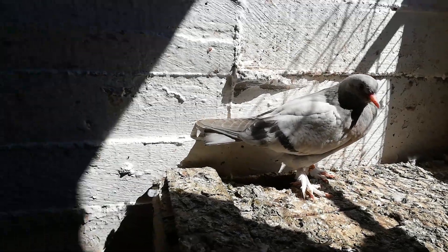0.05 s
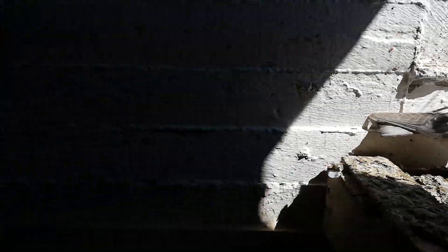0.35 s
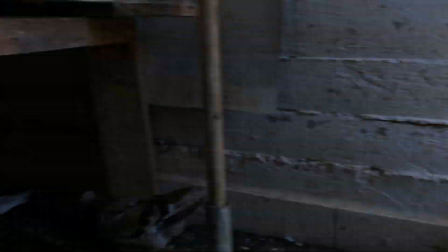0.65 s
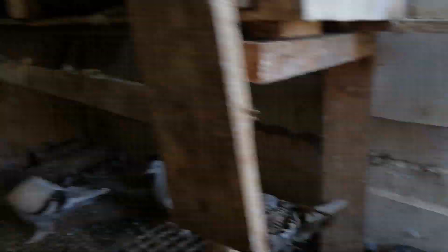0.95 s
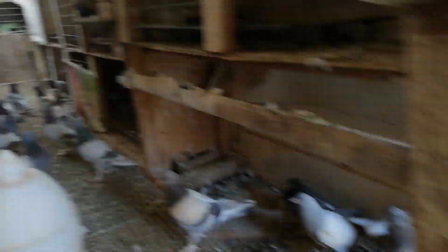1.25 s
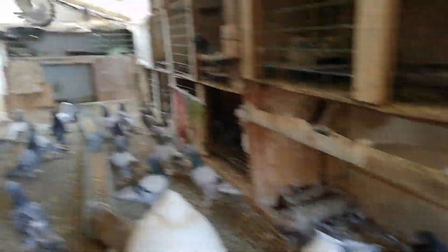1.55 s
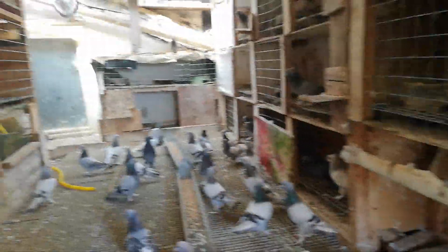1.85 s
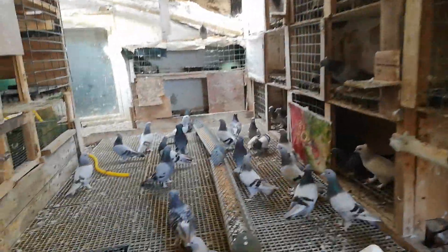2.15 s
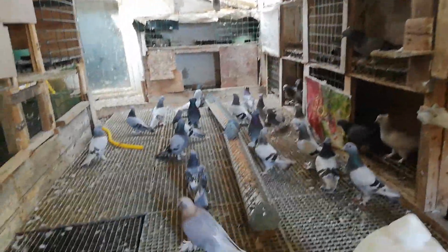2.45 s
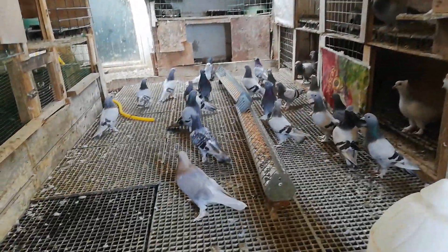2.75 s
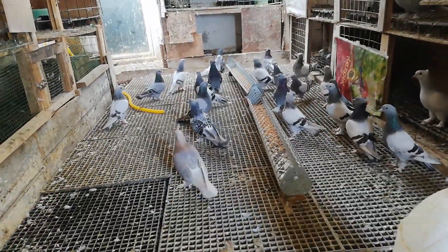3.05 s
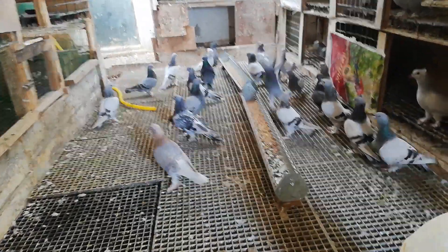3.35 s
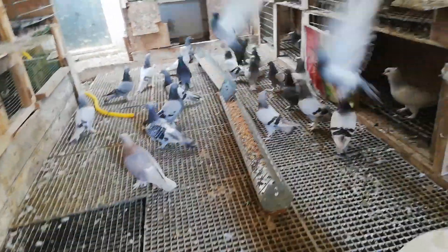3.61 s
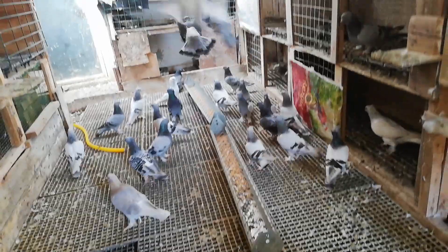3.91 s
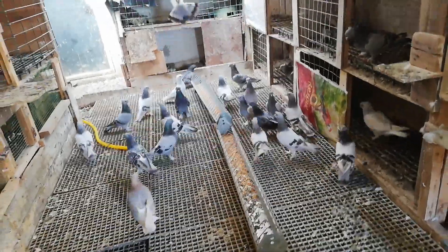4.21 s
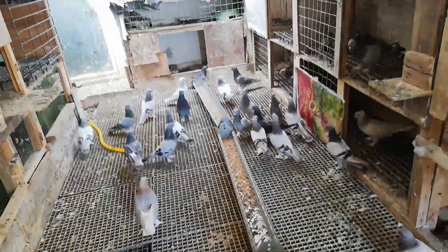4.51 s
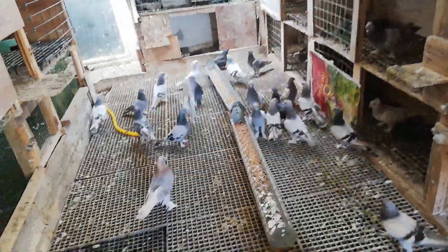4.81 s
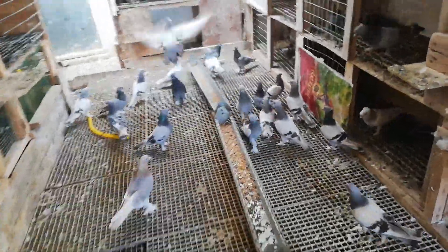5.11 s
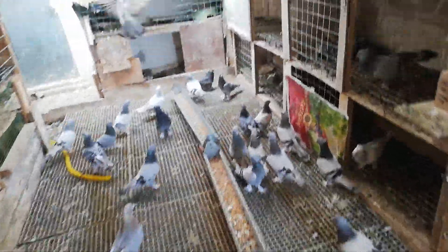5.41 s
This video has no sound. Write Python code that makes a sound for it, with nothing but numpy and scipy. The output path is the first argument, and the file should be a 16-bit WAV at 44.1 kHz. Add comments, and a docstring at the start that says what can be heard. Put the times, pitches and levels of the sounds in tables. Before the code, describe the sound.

Pigeons flutter in bursts, their wings clapping about eight times a second with a feathery snap, a hollow pop and a swish. The first and loudest burst gives way to quiet coos, thin peeps and claws ticking on grating, before a second burst and a softer third. The sounds are close, with a brief ring off the boards of a small loft and low buffeting on the hand-held microphone.

```python
"""In a small wooden loft, pigeons take off and flutter close to a hand-held microphone.
Their wing tips collide about eight times a second, each clap a snap of feathers and a pop of trapped air.
The strokes shed turbulence that swishes and buffets the microphone; the feathers rustle and whistle.
On the floor the flock shuffles, ticks on the grating, coos and gives short, thin calls.
Reflections off the boards add a brief ring to the impacts and the notes."""
import sys
import numpy as np
from scipy import signal
from scipy.fft import rfft, irfft, next_fast_len
from scipy.io import wavfile
from scipy.ndimage import map_coordinates

SR = 44100
rng = np.random.default_rng(int(sys.argv[2]) if len(sys.argv) > 2 else 0)


def dump(signal):
    """Clip the signal to [-1, 1] and save it as 16-bit WAV at the path in sys.argv[1]."""
    limited = np.clip(np.atleast_2d(signal).T, -1, 1)
    pcm = np.round(limited * 32767).astype(np.int16)
    wavfile.write(sys.argv[1], SR, pcm)


N = 249906
TIME = np.arange(N) / SR

# Bouts of flapping. Each row: start in seconds, rise time in seconds, end in seconds,
# decay in dB per second, then the levels of swish, rustle and push at full effort in dB.
BOUTS = [(0, 1, 1.266, 200, -38, -39, -44.5), (1.25, 0.44, 1.99, 187, -37, -45, -41.5),
         (3.39, .2, 4.39, 160, -38.3, -41.5, -41.5), (4.519, 0.011, 4.54, 71, -47, -42, -46.5),
         (4.81, 0.25, 5.53, 37, -41.5, -47.5, -44.5)]
# The start of a bout. One row: swish, rustle and push in dB relative to full effort.
BOUT_START_DB = (-13.5, -9.5, -14)
# Wing claps. Each row: start in seconds, relative level in dB, relative weight of the pop in dB,
# brightness of the snap (0 is neutral), time the feathers take to meet in seconds.
WING_CLAPS = [(0.0459, -42.5, 5, 13, 0.0014), (0.124, -37.5, 6, 5, 0.0064), (0.2485, -37, 6, 1.5, 0.012),
              (0.3738, -33.5, 5, -1, 0.011), (0.5023, -36.5, 3, -8, 0.0078),
              (0.574, -40.0, 0.5, -6, 0.0079), (0.6185, -35.5, -16, -3.5, 0.0054),
              (0.7314, -26, 1, -3.5, 0.011), (0.799, -35, 3, -4, 0.002), (0.8452, -28.5, 1, -2.5, 0.0034),
              (1.0886, -19.5, -3, 4.5, 0.00024), (1.2122, -22.5, 5, 2, 0.0018),
              (1.3402, -26.5, 7.5, 0.5, 0.0048), (1.4704, -24.5, 2, -2.5, 0.0016),
              (1.597, -20.5, -0.5, -1, 0.003), (1.7091, -16.5, -3, 5.5, 0.0089),
              (1.8192, -21.5, 1, 0, 0.0067), (1.9326, -26, 1.5, 0, 0.0067), (3.392, -36.5, 3, 0, 0.0066),
              (3.5139, -26, -1.5, 4, 0.004), (3.634, -27.5, 4, 3.5, 0.01), (3.7557, -28, 8.5, -1.5, 0.0033),
              (3.876, -24, 3, 1, 0.0038), (3.9933, -26, 3.5, -2, 0.0053), (4.115, -27.5, 9.5, -4, 0.011),
              (4.245, -37.5, 6, -1.5, 0.022), (4.3549, -28.5, -11, -2, 0.0092), (4.385, -35.5, 7, 0, 0.01),
              (4.527, -42.5, 7.5, -12, 0.012), (4.837, -39.5, -1, 15, 0.013), (4.8889, -38.5, -5, 1, 0.017),
              (5.01, -28.5, 0, -2.5, 0.019), (5.133, -36, 2, -2, 0.0063), (5.254, -33.5, -15, -5, 0.0056),
              (5.3691, -30, -6, -0.5, 0.0075), (5.616, -40.5, -18.5, 7, 0.0057)]
# Brief low rumbles as the hand-held microphone moves.
# Each row: middle in seconds, half length in seconds, level in dB.
HANDLING_RUMBLES = [(2.85, 0.44, -52), (4.23, .08, -41), (5.45, 0.14, -43)]
# Nearby claws and beaks on the grating. Each row: start in seconds, relative peak level in dB.
FLOOR_TAPS = [(2.1162, -37.5), (2.2417, -40.5), (2.2777, -38), (2.347, -47), (2.66, -43), (2.7687, -55),
              (2.898, -43), (2.9597, -37), (4.813, -30)]
# Notes of feathers and voices. Each row: start in seconds, length in seconds, start pitch in Hz,
# main pitch in Hz, level in dB, roughness from 0 to 1.
FEATHER_NOTES = [(1.52, 0.058, 995, 775, -40.5, 0.85), (1.645, 0.039, 874, 894, -36.5, 0.32),
                 (1.975, 0.025, 783, 825, -41, 0.54), (3.42, 0.055, 623, 666, -50, 0.23),
                 (3.555, 0.017, 810, 830, -38, 0.74), (4.285, 0.024, 1060, 1030, -42, 0.6),
                 (5.46, 0.02, 420, 354, -39.5, 0.83)]
CALL_NOTES = [(2.485, 0.054, 1022, 982, -57.5, 0.3), (2.888, .098, 1036, 1160, -48.5, 0.4),
              (2.985, 0.04, 1063, 1170, -57, 0.61), (4.135, 0.057, 1220, 1246, -42.5, 0.14),
              (4.66, 0.041, 1146, 1271, -40, 0.24), (4.706, 0.02, 1280, 1235, -33.5, 0.28),
              (4.734, 0.059, 1200, 1246, -47.5, 0.58), (4.833, 0.015, 1400, 1450, -44.5, 0.63),
              (5.2, 0.097, 1236, 1230, -37.5, 0.11)]
COO_NOTES = [(2.52, 0.091, 175, 150, -51.5, 0.8), (2.66, 0.2, 201, 150, -55, 0.75),
             (2.855, 0.047, 229, 222, -43.5, 0.42), (2.895, 0.09, 215, 185.4, -46.5, 0.72),
             (4.52, 0.053, 198, 191, -43, 0.8)]
# Spectra of the sources. Each row: frequency in Hz, relative spectral density in dB.
SWISH_SPECTRUM = [(150, -28), (400, -7.5), (700, 1), (950, 1), (1400, -1), (1900, -6.5), (3000, -13),
                  (8000, -16)]
RUSTLE_SPECTRUM = [(500, -7), (2000, 0), (4000, 4), (6000, 0.5), (8500, 5.5), (12000, -1), (14000, -17),
                   (16000, -18)]
PUSH_SPECTRUM = [(60, -26), (125, 1.5), (180, -5), (235, 0.5), (270, -1.5), (305, 4.5), (345, -3.5),
                 (450, -1.5), (900, -26.5)]
WALL_BUFFET_SPECTRUM = [(10, -8), (30, 2.5), (50, -9), (72, 5), (100, -4.5), (160, -20), (500, -47)]
OPEN_BUFFET_SPECTRUM = [(10, -18), (30, 3.5), (50, -2), (80, -7), (120, -11), (200, -29), (500, -55)]
SHUFFLE_SPECTRUM = [(20, -22), (70, -8), (170, -1.5), (300, -6.5), (600, -12), (1100, -8.5), (1800, -15),
                    (4000, -19), (5500, -21.5), (8000, -20), (12000, -21), (16000, -32)]
SNAP_SPECTRUM = [(100, -21), (700, -14), (2000, -6.5), (4000, -1), (6000, -0.5), (8500, 3.5), (12000, 0),
                 (14000, -5.5), (16000, -9)]
POP_SPECTRUM = [(60, -17.5), (200, -5.5), (600, -5), (1200, 0), (2200, -4), (3500, -10), (8000, -21.5)]
# Reverberation of the loft. Each row: frequency in Hz, time to decay by 60 dB in seconds.
LOFT_T60 = [(150, 0.23), (1000, 0.23), (3000, 0.23), (8000, 0.17), (15000, 0.16)]
# Diffuse sound at the two microphone ports. Each row: frequency in Hz, coherence from 0 to 1.
PORT_COHERENCE = [(20, 1), (80, 0.99), (150, 1), (330, 0.56), (600, 0), (1000, 0), (2000, 0.02)]
# Response of each port. Each row: frequency in Hz, gain in dB.
LEFT_RESPONSE = [(500, 1), (1100, -0.9), (2200, 0.17), (5000, 1.5), (8500, 0.5), (10500, -7),
                 (12500, -11.5), (15500, -9.5)]
RIGHT_RESPONSE = [(500, 1.1), (1100, 1.7), (2200, -0.5), (5000, 0.3), (8500, -2), (10500, 0.6), (12500, 2),
                  (15500, -5.2)]

BEAT_S, ONSET_DB_PER_S = 0.12, 900  # one wing beat; the attack of a bout
SWEEP_AT, PARTING_AT, DOWNWASH_AT = 0.53, 0.18, 0.78  # phases of the beat, 0-1 from the clap
WALL_UNTIL_S, WALL_LEAVE_S = 1.17, 0.17  # the microphone swings away from the wall
CORNER_HZ, CORNER_WIDTH_HZ, CORNER_DB = 1134, 250, -6
SWING_DB, SWING_DB_PER_S = -45.5, 6.5  # buffeting by the wall grows as the swing speeds up
DOWNWASH_DB, DOWNWASH_DEPTH_DB = -3.5, 2.5  # relative to the push; its rise and fall over a beat
DRAUGHT_DB, SHUFFLE_DB = -59, -57  # the loft's own draught; the flock when calm
STIR_DB, SETTLE_S = -18.5, 0.38  # the stirred flock relative to the swish; its settling time


def amp(db):
    """Amplitude grows tenfold for every 20 dB."""
    return 10 ** (np.asarray(db) / 20)


def unit_rms(x):
    """Normalisation brings the mean power to 1."""
    return x / np.sqrt(np.mean(x ** 2) + 1e-20)


def curve_at(points, hz):
    """Interpolation joins a table's points on a logarithmic frequency axis."""
    table_hz, values = np.transpose(points)
    return np.interp(np.log(hz + 1), np.log(table_hz + 1), values)


def wander(count, per_s):
    """A spline through random knots gives smooth fluctuation of rms about 1."""
    knots = rng.standard_normal(8192)
    return map_coordinates(knots, [np.arange(count) * per_s / SR], order=3, mode="wrap")


def diffuse_spectra(count):
    """A diffuse field is coherent at two nearby ports only at long wavelengths."""
    hz = np.fft.rfftfreq(count, 1 / SR)
    left, unrelated = rfft(rng.standard_normal((2, count)))
    coherence = np.clip(curve_at(PORT_COHERENCE, hz), -1, 1)
    right = coherence * left + np.sqrt(1 - coherence ** 2) * unrelated
    return hz, np.array([left, right])


def noise(spectrum):
    """Spectral weighting colours a diffuse field into stereo noise of rms 1."""
    hz, white = diffuse_spectra(next_fast_len(N, True))
    return unit_rms(irfft(white * amp(curve_at(spectrum, hz)))[:, :N])


def beat_phase():
    """Flapping is nearly periodic: whole cycles pass between the locally loudest claps."""
    starts, db = np.transpose(WING_CLAPS)[:2]
    neighbours = abs(starts[:, None] - starts) < BEAT_S * 3 / 4
    marks = starts[db >= np.where(neighbours, db, -np.inf).max(1)]
    cycles = np.round(np.diff(marks, prepend=0) / BEAT_S)
    return np.interp(TIME, marks, np.cumsum(cycles))


def wing_effort():
    """Envelopes of swish, rustle and push build, hold, and decay exponentially as a bird lands."""
    gains = np.zeros((3, N))
    for start, rise_s, end, fade_db_per_s, *levels in BOUTS:
        to_go = np.clip(1 - (TIME - start) / rise_s, 0, 1)
        effort_db = np.array(levels)[:, None] + np.outer(BOUT_START_DB, to_go)
        onset_db = ONSET_DB_PER_S * np.maximum(start - TIME, 0)
        fade_db = fade_db_per_s * np.maximum(TIME - end, 0)
        gains += amp(effort_db - np.minimum(onset_db + fade_db, 100))
    return gains


def eddies(x, depth_db, span_s, span_hz):
    """Turbulence makes short patches of the spectrum swell and fade by chance."""
    spectra = signal.stft(x, nperseg=512, noverlap=384)[2]
    bins, frames = np.indices(spectra.shape[1:])
    where = [bins * SR / 512 / span_hz, frames * 128 / SR / span_s]
    patches = map_coordinates(rng.standard_normal((256, 512)), where, order=3, mode="wrap")
    uneven = signal.istft(spectra * amp(depth_db * patches), nperseg=512, noverlap=384)[1]
    return unit_rms(uneven[:, :N])


def wing_strokes(beat, swish, rustle, push):
    """Airflow swishes on both down and up strokes; feather friction peaks as the wings part."""
    sweep = np.cos(2 * np.pi * 2 * (beat - SWEEP_AT))
    parting = np.cos(2 * np.pi * (beat - PARTING_AT))
    flow = eddies(noise(SWISH_SPECTRUM), depth_db=3.0, span_s=0.025, span_hz=175.8)
    air = flow * swish * amp(0.5 + 2.0 * sweep + 2.23 * wander(N, 70))
    vanes = eddies(noise(RUSTLE_SPECTRUM), depth_db=4.0, span_s=0.033, span_hz=1114)
    feathers = vanes * rustle * amp(-2.0 + 1.5 * parting + 0.57 * wander(N, 70) + 1.5 * wander(N, 1200))
    thrust = noise(PUSH_SPECTRUM) * push * amp(-3.0 + 0.43 * sweep + 3.4 * wander(N, 50))
    return air + feathers + thrust


def wall_nearness():
    """Proximity falls from 1 in the corner to 0 once the microphone faces the open loft."""
    return np.clip((WALL_UNTIL_S - TIME) / WALL_LEAVE_S, 0, 1)


def corner_resonance(swish):
    """Resonance in the corner reinforces one band of the swish, heard only from close by."""
    hz = np.geomspace(100, 8000, 200)
    peak_db = -20 * np.log10(1 + (2 * (hz - CORNER_HZ) / CORNER_WIDTH_HZ) ** 2)
    return noise(np.transpose([hz, peak_db])) * swish * wall_nearness() * amp(CORNER_DB)


def buffeting(beat, push):
    """Unsteady pressure rumbles on the microphone: first from its swing, then downwash and handling."""
    near = wall_nearness()
    swing = amp(SWING_DB + SWING_DB_PER_S * np.minimum(TIME, WALL_UNTIL_S))
    downwash = push * amp(DOWNWASH_DB + DOWNWASH_DEPTH_DB * np.cos(2 * np.pi * (beat - DOWNWASH_AT)))
    handling = sum(amp(db) * np.exp(-2 * ((TIME - mid) / half_s) ** 2)
                   for mid, half_s, db in HANDLING_RUMBLES)
    rumble = amp(DRAUGHT_DB) + handling
    by_wall = np.sqrt(near) * swing * noise(WALL_BUFFET_SPECTRUM)
    in_open = np.sqrt(1 - near) * np.hypot(downwash, rumble) * noise(OPEN_BUFFET_SPECTRUM)
    return (by_wall + in_open) * amp(2.03 * wander(N, 25))


def flock_shuffle(swish):
    """Incoherent sources add in power: calm shuffling, and a stir that settles after each flight."""
    retained = np.exp(-1 / (SETTLE_S * SR))
    stir = np.sqrt(signal.lfilter([1 - retained], [1, -retained], swish ** 2))
    envelope = np.hypot(amp(SHUFFLE_DB), amp(STIR_DB) * stir)
    return noise(SHUFFLE_SPECTRUM) * envelope * amp(1.25 * wander(N, 9))


def loft_tail(count=16384):
    """Reverberation off the boards decays exponentially, each band at its own rate; unit energy."""
    hz, frame_s, spectra = signal.stft(irfft(diffuse_spectra(count)[1]), SR, nperseg=256)
    decay = amp(-60 * frame_s / curve_at(LOFT_T60, hz)[:, None])
    tail = signal.istft(spectra * decay, SR)[1][:, :count]
    age = np.arange(count) / SR
    scatter_db = 1.24 * np.clip(rng.standard_normal(tail.shape), -2, 2)
    tail *= amp(scatter_db * np.exp(-age / 0.18))  # early echoes stand apart
    return tail / np.linalg.norm(tail[0])


def impact(meet_s, direct_db):
    """Stiff bodies meet in a fast-fading run of ticks while reverberation builds up behind them."""
    tail = loft_tail()
    count = tail.shape[1]
    progress = np.arange(count) / SR / max(meet_s, 0.0004)
    contact = np.exp(-progress)
    closing = 1 - 0.34 * np.exp(-progress / 0.43)  # the tips touch first
    ticks = rng.standard_normal(count) * contact * closing
    ticks *= amp(2.5 * np.clip(wander(count, 2540), -2, 2))
    ticks *= amp(direct_db) / np.linalg.norm(ticks)
    direct = np.array([np.pad(ticks, (lag, 0))[:count] for lag in rng.integers(0, 16, 2)])
    return direct + tail * np.sqrt(1 - contact ** 2) * amp(wander(count, 602))


def contact_colour(x, spectrum, brightness, vary_db, size=4096):
    """Timbre depends on the angle of contact: a minimum-phase filter with a tilt and chance humps."""
    hz = np.geomspace(60, 16000, 48)
    tilt_db = 0.59 * brightness * np.clip(np.log2(hz / 7500), -1, 1)
    humps_db = vary_db * np.clip(rng.standard_normal(len(hz)), -2, 2)
    response = np.transpose([hz, curve_at(spectrum, hz) + tilt_db + humps_db])
    log_gain = np.log(amp(curve_at(response, abs(np.fft.fftfreq(size, 1 / SR)))))
    taps = np.fft.ifft(np.exp(np.conj(signal.hilbert(log_gain)))).real[:size // 2]
    return signal.fftconvolve(x, taps[None] / np.linalg.norm(taps), axes=1)[:, :x.shape[1]]


def wing_claps():
    """Colliding wings radiate a bright snap of feathers and a hollow pop of trapped air."""
    out = np.zeros((2, N))
    head = SR * 3 // 100  # the first 30 ms set the level
    for start, db, pop_db, brightness, meet_s in WING_CLAPS:
        snap = contact_colour(impact(meet_s, direct_db=-5.5), SNAP_SPECTRUM, brightness, vary_db=1.62)
        pop = contact_colour(impact(meet_s, direct_db=-7.5), POP_SPECTRUM, brightness=0, vary_db=2.5)
        add(out, start, amp(db + 1) * snap / snap[:, :head].std())
        add(out, start, amp(db + pop_db - 10.5) * pop / pop[:, :head].std())
    return out


def add(mix, start_s, sound):
    """By superposition, a stereo sound adds to the mix from its start time."""
    part = mix[:, max(round(start_s * SR), 0):][:, :sound.shape[1]]
    part += sound[:, :part.shape[1]]


def floor_taps():
    """Impacts of claws and beaks tick on the grating: a few close by, many faint across the floor."""
    out = np.zeros((2, N))
    for start, db in FLOOR_TAPS:
        tick = contact_colour(impact(0.005, direct_db=-8.0), SNAP_SPECTRUM, brightness=6.3, vary_db=5.5)
        add(out, start, amp(db - 2.0) * tick / abs(tick).max())
    for when, faintness in rng.random((60, 2)):
        tick = contact_colour(impact(0.0022, direct_db=-5.0), SNAP_SPECTRUM, brightness=0, vary_db=7.0)
        add(out, when * N / SR, amp(-40.0 - 10 * faintness) * tick)
    return out


def in_loft(x, direct_db):
    """Convolution gives a sound its direct path and its reflections off the boards."""
    response = loft_tail()
    response[:, 0] += amp(direct_db)
    return signal.fftconvolve(x[None], response, axes=1)


def notes(rows, overtone_db, direct_db, flutter_hz):
    """Random modulation of pitch and amplitude roughens nearly pure, gliding tones."""
    out = np.zeros((2, N))
    for start, length_s, start_hz, main_hz, db, roughness in rows:
        progress = np.arange(0, 1, 1 / (length_s * SR))
        count = len(progress)
        glide_hz = start_hz + (main_hz - start_hz) * np.sin(2.28 * progress)  # arrives, then turns back
        hz = glide_hz * (1 + 0.096 * roughness * wander(count, flutter_hz))
        phase = 2 * np.pi * np.cumsum(hz) / SR
        swell = np.sin(np.pi * progress) ** 0.5 * amp(12.0 * roughness * wander(count, flutter_hz))
        tone = np.sin(phase) + amp(overtone_db) * np.sin(2 * phase)
        note = in_loft(swell * tone, direct_db)
        add(out, start, amp(db) * note / note[:, :count].std())
    return out


def feather_whistles():
    """Airflow over the flight feathers sounds a brief tone on the fastest strokes."""
    return notes(FEATHER_NOTES, overtone_db=-31.5, direct_db=-1.0, flutter_hz=220)


def thin_calls():
    """A high voice with almost no second harmonic sounds thin."""
    return notes(CALL_NOTES, overtone_db=-42, direct_db=-1.0, flutter_hz=166)


def coos():
    """A low, roughly modulated fundamental with a weak second harmonic makes a coo."""
    return notes(COO_NOTES, overtone_db=-23, direct_db=3.0, flutter_hz=109.5)


def scene():
    """Wings, moving air, voices and feet superpose on the murmur of the flock."""
    beat = beat_phase()
    swish, rustle, push = wing_effort()
    wings = feather_whistles() + wing_claps() + wing_strokes(beat, swish, rustle, push)
    corner = corner_resonance(swish)
    voices = thin_calls() + coos()
    return wings + corner + voices + buffeting(beat, push) + floor_taps() + flock_shuffle(swish)


def record(dry):
    """Each port filters the sound, the left duller on top; saturation and a low-pass follow."""
    size = next_fast_len(N + 4096, True)
    hz = np.fft.rfftfreq(size, 1 / SR)
    port_gains = amp([curve_at(LEFT_RESPONSE, hz), curve_at(RIGHT_RESPONSE, hz)])
    coloured = irfft(rfft(dry, size) * port_gains, size)[:, :N]
    rounded = coloured / (1 + (coloured / 0.88) ** 6) ** (1 / 6)
    low_pass = signal.firwin(255, cutoff=15850, window=("kaiser", 8), fs=SR)
    return signal.oaconvolve(rounded, low_pass[None], "same")


dry = scene()
out = record(dry)
dump(out)
```